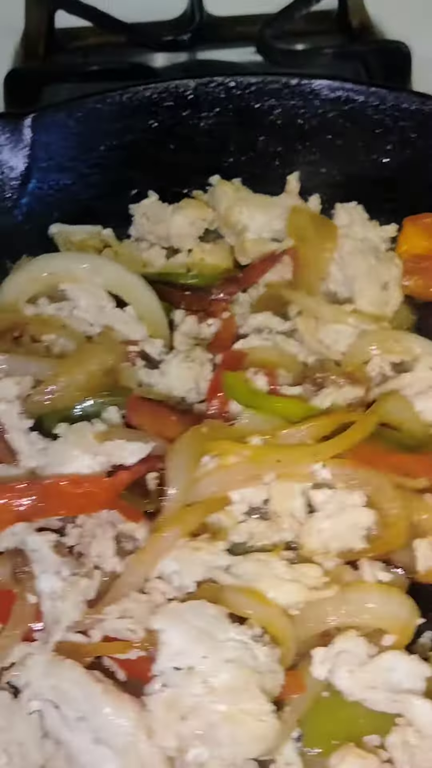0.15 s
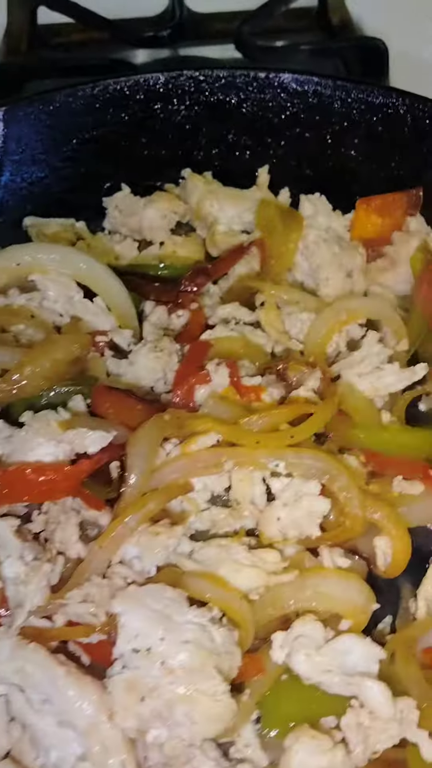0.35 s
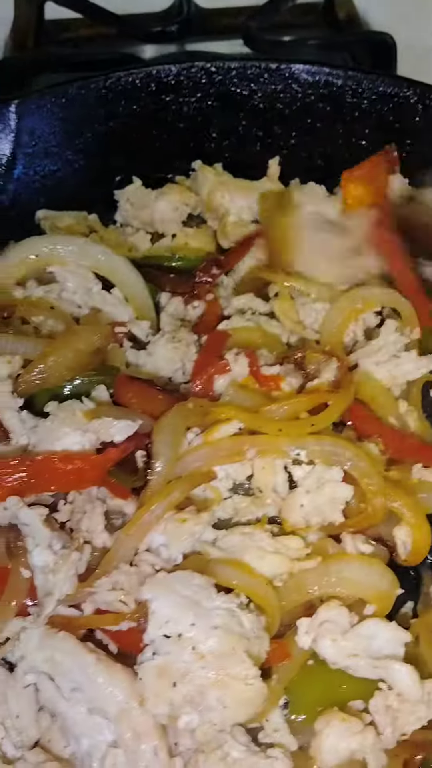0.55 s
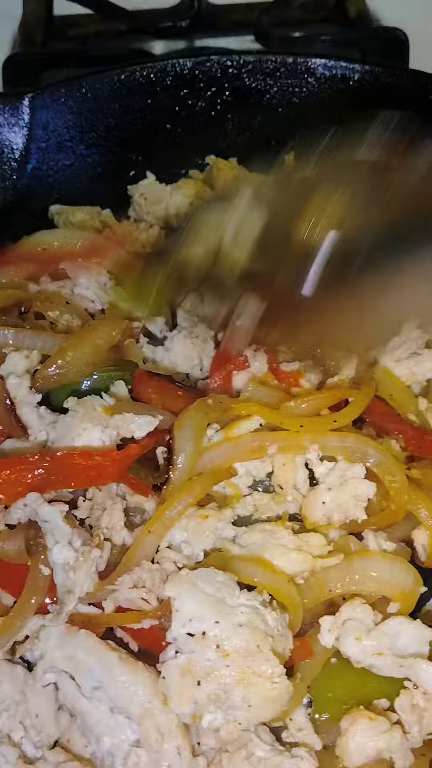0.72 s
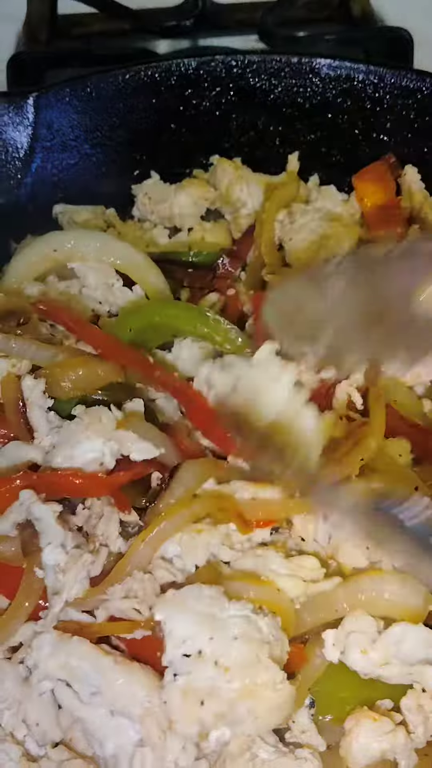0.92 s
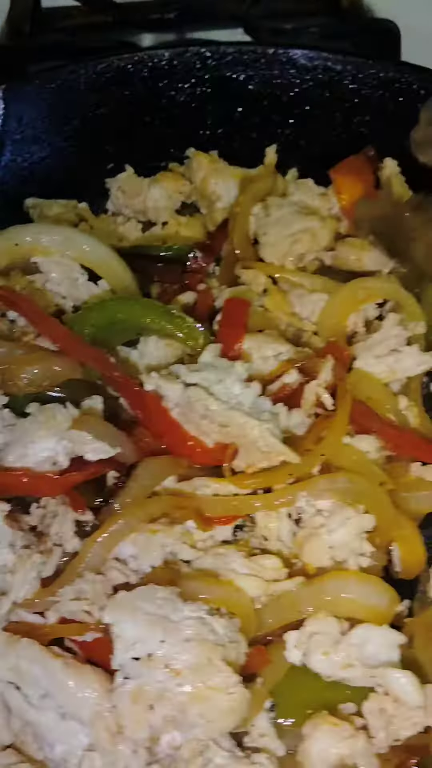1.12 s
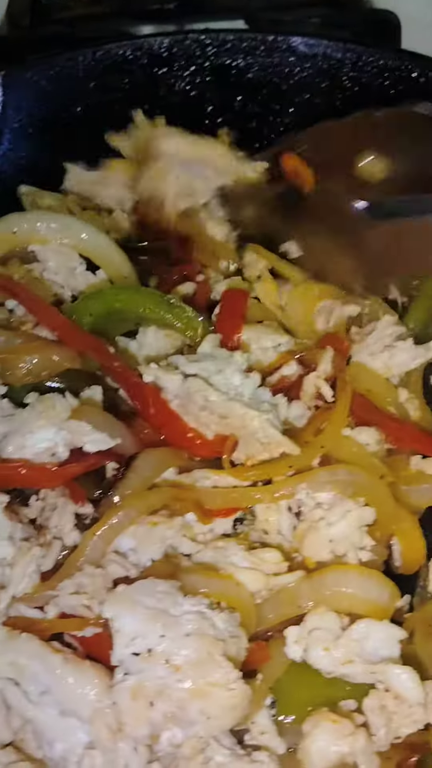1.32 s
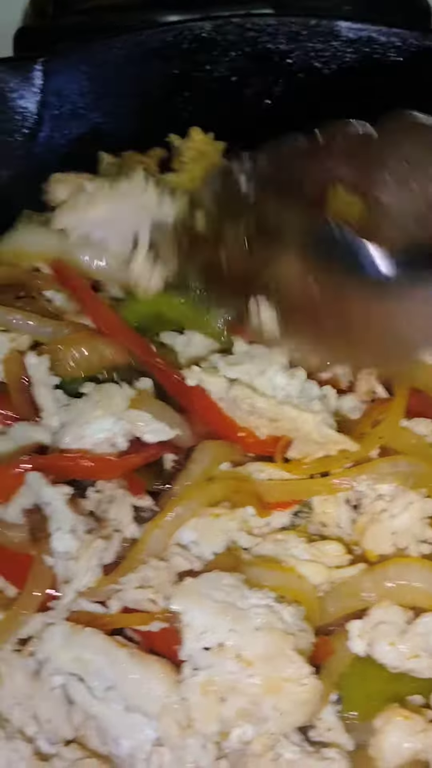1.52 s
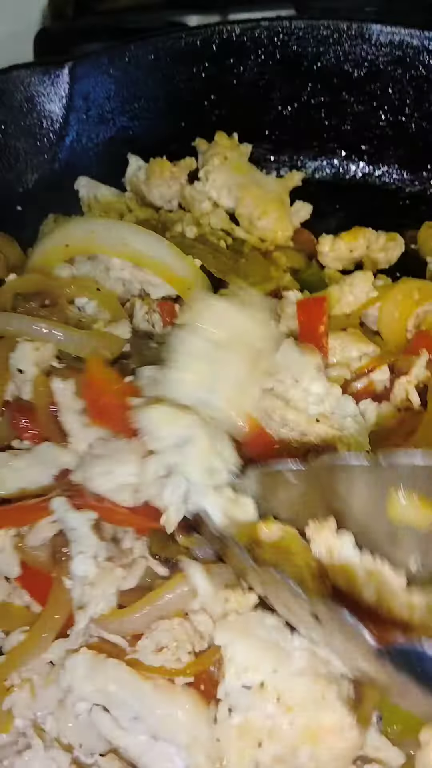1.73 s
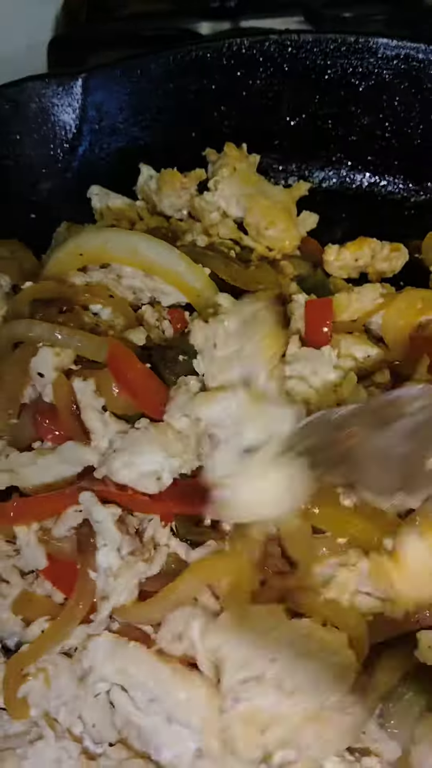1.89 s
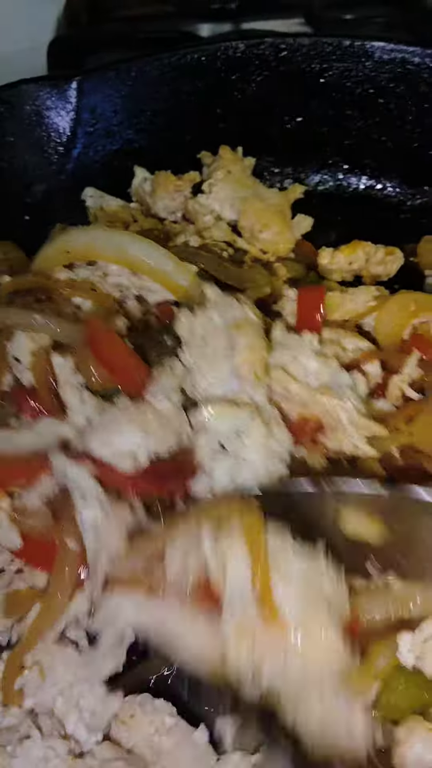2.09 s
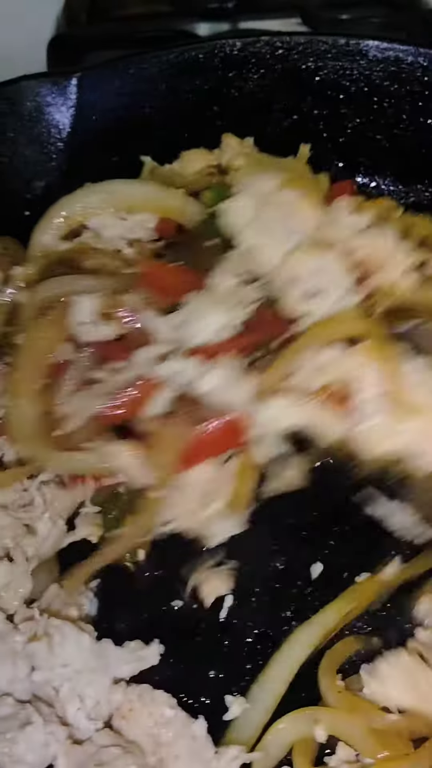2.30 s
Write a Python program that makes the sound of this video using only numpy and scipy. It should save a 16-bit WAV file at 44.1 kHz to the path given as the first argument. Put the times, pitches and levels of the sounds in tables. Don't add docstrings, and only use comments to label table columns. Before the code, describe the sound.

A metal spatula cracks against an iron frying pan, scraping through food that sizzles gently

```python
import sys
import numpy as np
from scipy import signal
from scipy.fft import rfft, irfft
from scipy.io import wavfile
from scipy.ndimage import uniform_filter1d

SR = 44100
rng = np.random.default_rng(int(sys.argv[2]) if len(sys.argv) > 2 else 0)


def natural_amplitude(level_db):
    exponent = np.asarray(level_db, float) / 20
    return 10 ** exponent


def waveform_to_disk(signal):
    frames = np.transpose(np.atleast_2d(signal))
    scaled = np.clip(frames, -1, 1) * 32767
    samples = np.round(scaled).astype(np.int16)
    wavfile.write(sys.argv[1], SR, samples)


N = 103635


def evened(x):
    return x / np.sqrt(np.mean(x ** 2) + 1e-20)


def read(points, hz):
    at, value = np.transpose(points)
    return np.interp(np.log(hz + 1), np.log(at + 1), value)


def add(mix, start_s, sound):
    part = mix[:, round(start_s * SR):][:, :sound.shape[1]]
    part += sound[:, :part.shape[1]]


def sides(db):
    return natural_amplitude(np.array([db / 2, -db / 2]))


def colour(pair, spectrum, side, lag_s=0.):
    hz = np.fft.rfftfreq(pair.shape[1], 1 / SR)
    lag = np.exp(2j * np.pi * hz * lag_s * np.array([[0], [1]]))
    gain = natural_amplitude(read(spectrum, hz)) * sides(read(side, hz)) * lag
    return evened(irfft(rfft(pair) * gain, pair.shape[1]))


def noise_pair(count, same):
    a, b = rfft(rng.standard_normal((2, count)))
    share = np.clip(read(same, np.fft.rfftfreq(count, 1 / SR)), -1, 1)
    return irfft(np.array([a, share * a + np.sqrt(1 - share ** 2) * b]), count)


def clicks(count, per_s, spread_db):
    present = rng.random(count) < per_s / SR
    size = natural_amplitude(spread_db * np.minimum(rng.exponential(1, count), 3.5))
    return present * size * rng.choice([-1, 1], count)


def resonate(x, hz, width_hz):
    r = np.exp(-np.pi * width_hz / SR)
    pole = r * np.exp(2j * np.pi * hz / SR)
    return (1 - r) * 2 * signal.lfilter([1], [1, -pole], x).real


# (frequency [Hz], density [dB per Hz])
FAN_RUMBLE = [(12, -40), (20, -4), (65, -0.5), (143, -1.5), (242, 0.5), (265, -7), (354, -2.5),
              (555, -14.5), (1500, -30.5), (1950, -61), (3300, -120)]
# (frequency [Hz], level [dB])
MAINS_HUM = [(59, -63), (118, -81.5), (238, -82.5), (353, -56)]
# (frequency [Hz], left-right correlation [-1..1])
ROOM_SAME = [(60, 0.85), (240, 0.86), (950, 0.13), (3770, -0.16), (15000, 0.23)]
# (frequency [Hz], left-right [dB])
ROOM_SIDE = [(60, 4), (180, -1), (550, 0.5), (1650, -1), (4970, 6), (15000, 11)]


def kitchen():
    rumble = natural_amplitude(-45.5) * colour(noise_pair(N, ROOM_SAME), FAN_RUMBLE, ROOM_SIDE)
    hum = 0
    for hz, db in MAINS_HUM:
        hum = hum + natural_amplitude(db) * evened(resonate(rng.standard_normal(N), hz, width_hz=9.3))
    return rumble + hum


# (frequency [Hz], density [dB per Hz])
SIZZLE_SPECTRUM = [(300, -48), (520, -0.5), (1400, -4), (2700, -2.5), (5600, -5), (7500, -17.5),
                   (10500, -22.5), (15000, -15.5)]
# (time [s], level [dB])
SIZZLE_LEVEL = [(0.0, -51), (0.44, -49.5), (0.8, -51), (1.39, -50.5), (1.63, -50.5), (1.87, -50.5),
                (2.35, -47.5)]


def sizzle():
    pop_s = .0015
    puff = rng.standard_normal((2, 400)) * np.exp(-np.arange(400) / SR / pop_s)
    bursts = clicks(N, per_s=500, spread_db=4.)
    pops = signal.oaconvolve(bursts[None], puff, axes=1)[:, :N]
    hiss = evened(noise_pair(N, ROOM_SAME))
    fizz = colour(hiss + natural_amplitude(-8) * evened(pops), SIZZLE_SPECTRUM, ROOM_SIDE)
    level_db = np.interp(np.arange(N) / SR, *np.transpose(SIZZLE_LEVEL)) + 4.0
    return fizz * natural_amplitude(level_db)


# (frequency [Hz], left-right [dB])
PAN_SIDE = [(60, 5), (150, 4), (380, 9.5), (950, -2), (2380, -9), (5980, 1.5), (15000, 0)]


def pan_noise(pair, spectrum):
    return colour(pair, spectrum, PAN_SIDE, lag_s=-.00017)


# (time [s], pressure [dB])
SCRAPE_STROKES = [
    [(.26, -45), (.29, -49), (.34, -43), (.37, -47.5), (.46, -73)],
    [(1.25, -45.5), (1.30, -42), (1.33, -34.5), (1.37, -36.5), (1.40, -34), (1.43, -42)],
]
# (frequency [Hz], width [Hz], level [dB])
SCRAPE_RING = [(638, 47, 4.5), (1120, 79, 0.5), (1300, 63, -5), (1808, 34, 2.5), (2850, 47, -6.5),
               (4710, 55, -6), (5560, 49, -16), (6640, 66, -25), (8700, 80, -17), (11500, 60, -29),
               (14000, 100, -17), (14600, 100, -16), (15600, 200, -15)]
# (frequency [Hz], density [dB per Hz])
CRACK_SPECTRUM = [(200, -19), (800, 10.5), (2500, -7), (5600, 7), (7500, -7.5), (10000, -12.5), (14500, -4),
                  (16500, -1)]


def scrape():
    t = np.arange(N) / SR
    push = 0
    for stroke in SCRAPE_STROKES:
        push = push + natural_amplitude(np.interp(t, *np.transpose(stroke), left=-120, right=-120))
    slips = natural_amplitude(-7) * evened(clicks(N, per_s=1200, spread_db=5))
    slips = slips + evened(noise_pair(N, [(100, 0.18), (9000, 0.038)]))
    body = 0
    for hz, width_hz, db in SCRAPE_RING:
        body = body + natural_amplitude(db) / np.sqrt(width_hz) * resonate(slips, hz, width_hz)
    rasp = natural_amplitude(-5.5) * pan_noise(slips, CRACK_SPECTRUM)
    z = signal.stft(evened(body) + rasp, nperseg=256)[2]
    grit = uniform_filter1d(rng.standard_normal(z.shape[1:]), size=5, axis=0)
    grit = evened(uniform_filter1d(grit, size=5, axis=1))
    rough = signal.istft(z * natural_amplitude(3 * grit), nperseg=256)[1][:, :N]
    return push * sides(4.3)[:, None] * evened(rough)


# (frequency [Hz], right lead [turns], left-right [dB])
PORTS = [(265, -.03, -6), (450, .03, 1), (650, -.03, 4), (895, -.25, 3), (1034, .01, -7), (1095, -.18, 6),
         (1300, -.12, 7), (1780, .22, -1), (2355, .17, -5), (2900, -.21, -5), (4050, .02, 4)]


def pan_ring(modes, t, free_s):
    hz, db, t60 = np.transpose(modes)[:, :, None]
    at, turns, side_db = np.transpose(PORTS)
    lead = np.array([0 * hz, np.interp(hz, at, turns)])
    flip = rng.integers(0, 2, hz.shape) / 2
    flutter_s = 0.00654
    knots = rng.standard_normal((len(modes), 99))
    shake = np.array([np.interp(t / flutter_s, np.arange(99), row) for row in knots])
    db = db + 4. * np.minimum(hz / 5000, 1) * shake
    muffle_db = 500 * np.maximum(t - free_s, 0)
    envelope = natural_amplitude(db - 60 * t / t60 - muffle_db)
    waves = np.sin(2 * np.pi * (hz * t + flip + lead))
    return (envelope * sides(np.interp(hz, at, side_db)) * waves).sum(1)


def tilted(spectrum, db_per_octave):
    return [(hz, db + db_per_octave * np.log2(hz / 2000)) for hz, db in spectrum]


def contact_noise(count):
    return noise_pair(count, [(250, 0.99), (900, 0.21)])


# (frequency [Hz], density [dB per Hz])
CLATTER_SPECTRUM = [(40, -31), (110, -12.5), (600, -4), (2300, -12), (5600, -16.5), (8000, -27),
                    (10500, -33.5), (15500, -27.5)]
# (frequency [Hz], T60 [s])
CLATTER_T60 = [(100, 0.29), (500, 0.23), (2000, 0.23), (5000, 0.18), (9000, 0.17), (15000, 0.17)]


def blade_clatter(t, tilt_db):
    noise = pan_noise(contact_noise(len(t)), tilted(CLATTER_SPECTRUM, tilt_db))
    hz, frame_s, z = signal.stft(noise, SR, nperseg=256)
    patches = evened(uniform_filter1d(rng.standard_normal(z.shape[1:]), size=14, axis=1))
    decay_db = 60 * frame_s / read(CLATTER_T60, hz)[:, None]
    return signal.istft(z * natural_amplitude(2 * patches - decay_db), SR, nperseg=256)[1][:, :len(t)]


def contact_crack(t, tilt_db):
    t60_s, snap_s = 0.014, .0011
    burst = pan_noise(contact_noise(len(t)), tilted(CRACK_SPECTRUM, tilt_db)) * natural_amplitude(-60 * t / t60_s)
    impulse = np.sinc(SR * (t - snap_s)) * np.ones((2, 1))
    return burst + natural_amplitude(-25.5) * pan_noise(impulse, tilted(CRACK_SPECTRUM, tilt_db + 1))


def blow(modes, ring_rise_s, free_s, ring_db, clatter_db, crack_db, tilt_db):
    t = np.arange(SR // 2) / SR
    ring = natural_amplitude(ring_db) * pan_ring(modes, t, free_s) * (1 - np.exp(-t / ring_rise_s))
    clatter = natural_amplitude(clatter_db) * blade_clatter(t, tilt_db) * (1 - np.exp(-t / 0.0024))
    crack = natural_amplitude(crack_db) * contact_crack(t, tilt_db) * (1 - np.exp(-t / 0.0006))
    return ring + clatter + crack


# (frequency [Hz], level [dB], T60 [s])
WALL = [(440.4, -5, 0.32), (345, -41, 0.14), (655.5, -23, 0.25), (1095, -4, 0.21), (1323, -8.5, 0.31),
        (2110, -12.5, 0.47), (2388, -18, 0.18), (2345, -2, 0.24), (2700, -10, 0.092), (2920, -7.5, 0.22),
        (4030, -18, 0.21), (5230, -7, 0.05)]
# (time [s], ring [dB], clatter [dB], crack [dB], brightness [dB per octave])
WALL_BLOWS = [
    (0.2031, -16.5, -13.5, -11, 0.99),
]
# (frequency [Hz], level [dB], T60 [s])
LIP = [(1776, -1, 0.49), (4005, -6, 0.13)]
# (time [s], ring [dB], clatter [dB], crack [dB], brightness [dB per octave])
LIP_BLOWS = [
    (0.203, -14.5, -60, -60, 0.),
]
# (frequency [Hz], level [dB], T60 [s])
SHEEN = [(3340, -1.5, 0.066), (5720, 6, 0.067), (6300, -16, 0.053), (4880, -1, 0.14), (7424, -19, 0.065),
         (8440, -16, 0.09), (10150, -6, .03), (10800, -26, 0.12), (13100, -25, .11), (14100, -19, .13),
         (14950, -19, .15), (15570, -8, .08)]
# (time [s], ring [dB], clatter [dB], crack [dB], brightness [dB per octave])
SHEEN_BLOWS = [
    (.2040, -25.5, -60, -60, 0.),
    (2.0615, -29, -60, -60, 0.),
    (2.0905, -33.5, -60, -60, 0.),
]
# (frequency [Hz], level [dB], T60 [s])
KNOCK = [(615.4, -4.5, 0.16), (454.6, -4.5, 0.14), (1096, -6, 0.071), (5860, -15, 0.034)]
# (time [s], ring [dB], clatter [dB], crack [dB], brightness [dB per octave])
KNOCK_BLOWS = [
    (0.2213, -17, -20.5, -47, 0.5),
    (0.3182, -23.5, -34.5, -44, -2),
]
# (frequency [Hz], level [dB], T60 [s])
SWELL = [(1794, 5, 0.18), (1830, -3, 0.13), (2130, -12, 0.25), (2360, -10, 0.11)]
# (time [s], ring [dB], clatter [dB], crack [dB], brightness [dB per octave])
SWELL_BLOWS = [
    (0.278, -25, -39, -60, -0.74),
]
# (frequency [Hz], level [dB], T60 [s])
TICK = [(5470, -5, 0.097), (6360, -14, .07), (4700, -16, 0.061), (3380, -12, 0.034)]
# (time [s], ring [dB], clatter [dB], crack [dB], brightness [dB per octave])
TICK_BLOWS = [
    (.3170, -38, -58, -35, 0.),
    (.3400, -46, -70, -60, 0.),
    (.3574, -36.5, -70, -50, 0.),
    (.3779, -40, -62, -60, 0.14),
    (1.2390, -51, -66, -37, 1.),
    (1.3161, -42, -70, -50, 0.),
    (1.3350, -40, -70, -60, 0.),
    (1.3530, -45, -72, -60, 0.),
]
# (frequency [Hz], level [dB], T60 [s])
TIP = [(5650, -3, .03), (9500, -3, .03), (11600, -1, .025), (14600, 0, .02)]
# (time [s], ring [dB], clatter [dB], crack [dB], brightness [dB per octave])
TIP_BLOWS = [
    (0.3785, -36, -39, -28.5, 2.6),
]
# (frequency [Hz], level [dB], T60 [s])
DAB = [(3510, 1, 0.035), (4060, 2, .03), (2420, -3, 0.037), (2960, 3, .03)]
# (time [s], ring [dB], clatter [dB], crack [dB], brightness [dB per octave])
DAB_BLOWS = [
    (0.4275, -38, -72, -41.5, -0.72),
    (.4330, -41, -68, -42, 0.),
]
# (frequency [Hz], level [dB], T60 [s])
DAB_HIGH = [(4750, 0, 0.035), (4300, 3, 0.028), (5270, -7, .025)]
# (time [s], ring [dB], clatter [dB], crack [dB], brightness [dB per octave])
DAB_HIGH_BLOWS = [
    (0.443, -37, -69, -45, 0.),
    (0.4962, -42, -70, -47, 0.),
]
# (frequency [Hz], level [dB], T60 [s])
FOOD = [(464.5, -3, 0.24), (654, -2.5, 0.36), (892, -6, 0.44), (1035.5, -10.5, 0.73), (721, 1, 0.09),
        (2980, -28, 0.35), (3364, -23.5, 0.37)]
# (time [s], ring [dB], clatter [dB], crack [dB], brightness [dB per octave])
FOOD_BLOWS = [
    (1.2387, -25.5, -34, -31.5, 0),
    (1.315, -35.5, -34.5, -35, 0.),
]
# (frequency [Hz], level [dB], T60 [s])
GLINT = [(9300, -2.5, 0.11), (11330, 6, 0.046), (14000, -4, .1), (2840, 1, .3), (3360, -5, .2)]
# (time [s], ring [dB], clatter [dB], crack [dB], brightness [dB per octave])
GLINT_BLOWS = [
    (1.2540, -44, -70, -70, 0.),
]
# (frequency [Hz], level [dB], T60 [s])
EDGE = [(643, -8, 0.18), (1093, -2.5, 0.061), (1290, -0.5, 0.031), (1790, -6, 0.075), (2050, -8.5, .05),
        (2820, -9, 0.04), (4090, -0.5, 0.013), (5180, -2.5, 0.029), (877, 0, 0.026)]
# (time [s], ring [dB], clatter [dB], crack [dB], brightness [dB per octave])
EDGE_BLOWS = [
    (1.403, -17.5, -27.5, -24, 0.5),
    (1.9696, -58, -57, -61, -9),
]
# (frequency [Hz], level [dB], T60 [s])
BLADE = [(628, 2.5, 0.17), (482.5, -11.5, 0.21), (1100, -6, 0.14), (1325, -7, 0.12), (1735, -13.5, 0.29),
         (2350, -12, 0.75), (267.3, -10.5, 0.94), (4400, -14.5, 0.28), (6200, 2, 0.027), (14300, 1, 0.007),
         (12950, 6, 0.0092), (15300, 3, .012), (886, -13, .2)]
# (time [s], ring [dB], clatter [dB], crack [dB], brightness [dB per octave])
BLADE_BLOWS = [
    (2.0608, -14, -19, -7.5, 2.2),
]
# (frequency [Hz], level [dB], T60 [s])
BARE = [(350, -26, 0.18), (486, -6.5, 0.19), (595, 4.5, 0.06), (1033, -12.5, 0.59), (1096, 0.5, 0.075),
        (1298, -2.5, 0.45), (1620, -29, 0.055), (2007, -9, 0.15), (2403, -5.5, 0.14), (2730, -13.5, 0.18),
        (4410, -18, 0.13), (5270, 4.5, 0.019), (6150, -10, 0.082)]
# (time [s], ring [dB], clatter [dB], crack [dB], brightness [dB per octave])
BARE_BLOWS = [
    (2.09, -15.5, -17, -11, -2.65),
]
# (frequency [Hz], level [dB], T60 [s])
SWING = [(896, 1.5, 0.34), (2358, -4, 0.2), (654, -6, 0.33), (264, -7, 0.16), (1743, -13, 0.18)]
# (time [s], ring [dB], clatter [dB], crack [dB], brightness [dB per octave])
SWING_BLOWS = [
    (2.1030, -15, -32, -60, -1.7),
]


def blows():
    # modes, blows, rise of the ring [s], left-right [dB], time ringing free [s]
    spots = [
        (WALL, WALL_BLOWS, .0005, 1.9, .13),
        (LIP, LIP_BLOWS, .002, 1.5, .034),
        (SHEEN, SHEEN_BLOWS, .0006, 2.2, .06),
        (KNOCK, KNOCK_BLOWS, .0023, 1.5, .045),
        (SWELL, SWELL_BLOWS, .008, .66, .065),
        (TICK, TICK_BLOWS, .0015, 3., .03),
        (TIP, TIP_BLOWS, .0015, 5.8, .1),
        (DAB, DAB_BLOWS, .0023, 1.5, .1),
        (DAB_HIGH, DAB_HIGH_BLOWS, .002, 1.5, .1),
        (FOOD, FOOD_BLOWS, .0028, 3.9, .12),
        (GLINT, GLINT_BLOWS, .004, 4., .022),
        (EDGE, EDGE_BLOWS, .00014, 3.6, .1),
        (BLADE, BLADE_BLOWS, .006, 2., .036),
        (BARE, BARE_BLOWS, .0005, 0., .45),
        (SWING, SWING_BLOWS, .0083, 1.3, .4),
    ]
    out = np.zeros((2, N))
    for modes, rows, rise_s, side_db, free_s in spots:
        for start_s, *levels in rows:
            add(out, start_s, sides(side_db)[:, None] * blow(modes, rise_s, free_s, *levels))
    return out


def scene():
    return kitchen() + sizzle() + scrape() + blows()


def roll_off(x):
    return signal.sosfilt(signal.butter(12, 16970, fs=SR, output="sos"), x)


def record(dry):
    ceiling = 1.3
    rounded = ceiling * np.tanh(dry / ceiling)
    edge = signal.firwin(511, 15950, window=("kaiser", 9), fs=SR)
    top = signal.firwin(511, 16900, window=("kaiser", 9), fs=SR)
    two_steps = edge + natural_amplitude(-26) * (top - edge)
    mix = signal.oaconvolve(rounded, two_steps[None], "same")
    return roll_off(mix)


dry = scene()
out = record(dry)
waveform_to_disk(out)
```